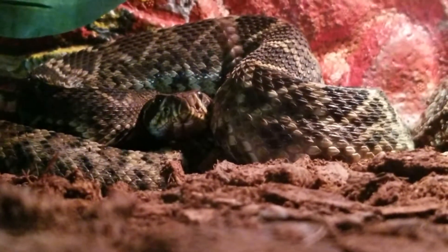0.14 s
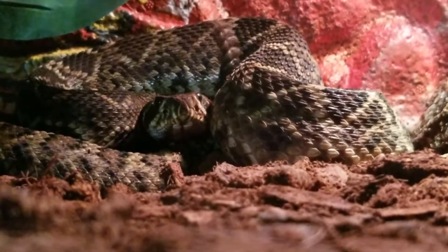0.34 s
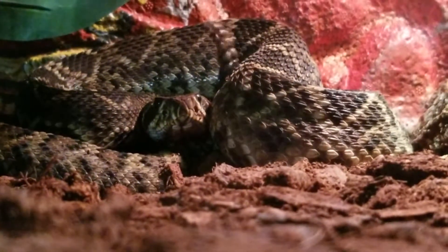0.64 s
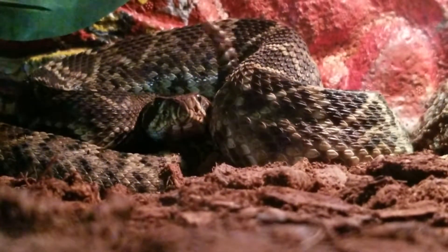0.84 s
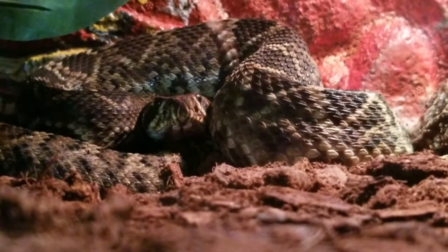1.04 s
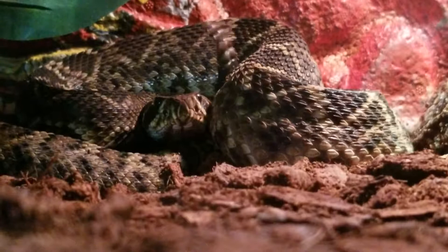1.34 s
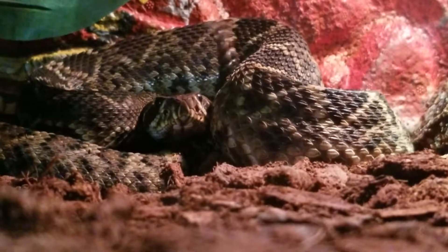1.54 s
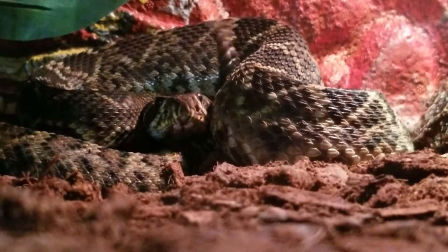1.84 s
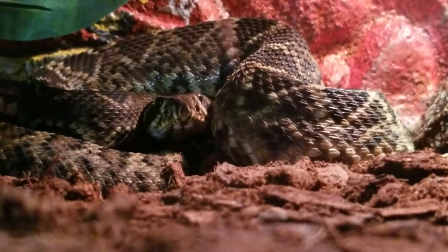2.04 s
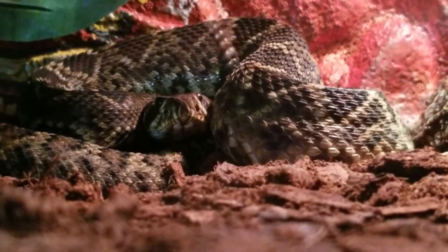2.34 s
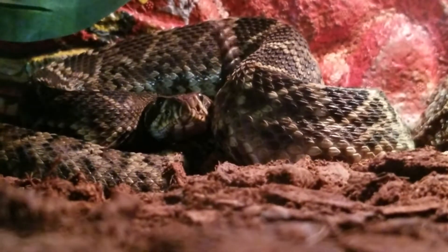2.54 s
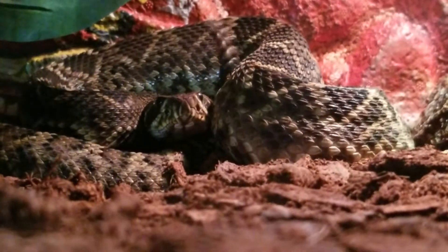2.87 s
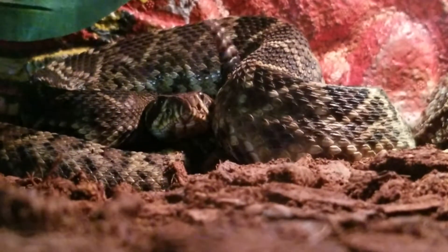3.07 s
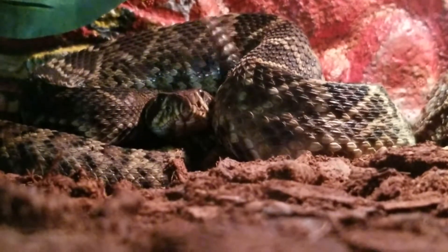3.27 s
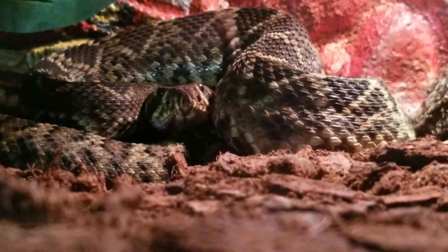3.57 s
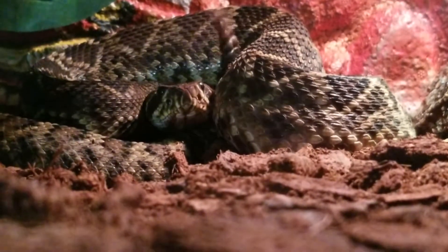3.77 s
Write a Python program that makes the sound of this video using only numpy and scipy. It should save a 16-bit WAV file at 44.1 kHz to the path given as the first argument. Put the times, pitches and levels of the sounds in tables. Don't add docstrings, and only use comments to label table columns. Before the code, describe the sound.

A rattlesnake's rattle buzzes nonstop, a dry, bright, hissing chatter close up in a small enclosure.

```python
import sys
import numpy as np
from scipy import signal
from scipy.fft import rfft, irfft, next_fast_len
from scipy.io import wavfile
from scipy.ndimage import uniform_filter1d, map_coordinates

SR = 44100
rng = np.random.default_rng(int(sys.argv[2]) if len(sys.argv) > 2 else 0)


def to_wav(sig):
    pcm = np.clip(np.atleast_2d(sig), -1, 1) * 32767
    pcm = np.round(pcm).astype(np.int16)
    wavfile.write(sys.argv[1], SR, pcm.T)


def how_loud(loudness_db):
    steps = np.asarray(loudness_db, float) / 20
    return 10 ** steps


N = 172431
CLACK_RATE = 102
PLACES = 3


def unit(x):
    return x / np.sqrt(np.mean(x ** 2) + 1e-20)


def along(points, hz):
    f, v = np.transpose(points)
    return np.interp(np.log(hz + 1), np.log(f + 1), v)


def wobble(rate):
    knots = rng.standard_normal(int(N * rate / SR) + 4)
    return map_coordinates(knots, [np.arange(N) * rate / SR])


def filtered(x, response):
    m = 2 * next_fast_len(N // 2 + SR // 4)
    hz = np.fft.rfftfreq(m, 1 / SR)
    return irfft(rfft(x, m) * response(hz), m)[..., :N]


def causal(db):
    c = irfft(np.log(how_loud(np.maximum(db, -90))))
    c[1:len(c) // 2] *= 2
    c[len(c) // 2 + 1:] = 0
    return np.exp(rfft(c))


def patchy(x, patchy_db):
    z = signal.stft(x, nperseg=512)[2]
    field = rng.standard_normal(z.shape[1:])
    field = uniform_filter1d(field, size=3, axis=0)
    field = uniform_filter1d(field, size=12, axis=1)
    return signal.istft(z * how_loud(patchy_db * unit(field)), nperseg=512)[1][:, :N]


def rush(spectrum):
    # frequency in Hz, left-right correlation.
    likeness = [(60, 0.97), (130, 0.87), (300, 0.67), (640, 0.42), (2000, 0.24)]

    def mid_side(hz):
        turn = np.arccos(np.clip(along(likeness, hz), -1, 1)) / 2
        return how_loud(along(spectrum, hz)) * [np.cos(turn), np.sin(turn)]

    mid, side = filtered(rng.standard_normal((2, N)), mid_side)
    return np.array([mid + side, mid - side]) / mid.std()


def rattle():
    t = np.arange(N) / SR
    # time in seconds, lead over the steady beat in clacks, contrast within a swing as a factor, level in dB.
    shake = [(0, -0.0072, 2.1, -39), (0.199, -0.2, .7, -41), (0.401, 0.0048, 0.76, -40),
             (0.649, 0.19, 1.4, -42), (0.902, -0.016, 1.5, -41.5), (1.15, 0.04, 1.8, -41),
             (1.361, 0.032, 1, -43), (1.461, 0.36, 1.84, -39.5), (1.7, 0.27, 1.17, -43),
             (1.95, 0.008, 0.85, -41.5), (2.201, 0.017, 1.37, -41.5), (2.45, -0.16, 1.54, -43.5),
             (2.697, -0.55, 1.5, -41.5), (2.951, -0.67, 1.4, -43), (3.199, -0.82, 2.15, -41.5),
             (3.451, -0.9, 1.1, -41.5), (3.698, -0.92, 0.91, -40.5), (3.91, -0.9, 1.5, -41)]
    s, *columns = np.transpose(shake)
    ahead, contrast, level_db = (np.interp(t, s, c) for c in columns)
    beat = CLACK_RATE * t + ahead + 0.15

    def upper(hz):
        return 1 / (1 + (8700 / (hz + 1)) ** 6)

    dark, bright = clacks(t, beat, contrast, level_db)
    blows = filtered(dark, lambda hz: 1 - upper(hz))
    blows += how_loud(1.5 * np.tanh(wobble(10))) * filtered(bright, upper)
    blows += how_loud(-3.5) * chatter(t, beat, contrast)

    sweep_s = 0.000015
    position = np.arange(PLACES) - (PLACES - 1) / 2
    lag = np.outer([1, -1], position)[..., None] * sweep_s
    direct = filtered(blows, lambda hz: np.exp(1j * np.pi * hz * lag)).sum(1)
    heard = direct + how_loud(0.5) * sum(panes(place[None]) for place in blows)

    # frequency in Hz, gain in dB.
    mic = [(11000, 0), (12700, 2), (13200, -2), (13900, -2), (14500, 3), (15100, 8), (15700, 10)]
    heard = patchy(heard, patchy_db=1.35)
    heard = filtered(heard, lambda hz: segments(hz) * causal(along(mic, hz)))
    power = np.abs(uniform_filter1d(heard.mean(0) ** 2, SR // 4))
    return heard * how_loud(level_db) / np.sqrt(power)


def clacks(t, beat, contrast, level_db):
    count = 20
    scatter_db, tilt_db, jitter_s = 2.0, 1.8, 0.0004
    spread_s, tick_db = 0.0017, 1.2
    # time in seconds, peak in dB, treble relative to the peak in dB.
    accents = [(0.0973, -30, -18), (0.1364, -33.5, -17.5), (0.185, -26, -16.5), (0.2844, -23.5, -17),
               (0.3807, -29.5, -19), (0.528, -30, -7), (0.7109, -31.5, -21), (0.7617, -33.5, -8),
               (0.8117, -30.5, -14), (0.8592, -31.5, -14.5), (0.9573, -32, -13.5), (1.1537, -27.5, -10),
               (1.2027, -28, -11.5), (1.2516, -26, -8), (1.3015, -27.5, -14), (1.3506, -30.5, -15),
               (1.3992, -26, -5.5), (1.4671, -32.5, -8), (1.5243, -32.5, -14), (1.6237, -33, -18),
               (1.6708, -27.5, -16), (1.7224, -28.5, -13), (1.7719, -27.5, -10), (1.82, -26.5, -7.5),
               (1.8678, -24, -10), (1.9096, -25.5, -10.5), (1.9603, -29, -19), (2.0086, -28, -11.5),
               (2.0553, -34, -6.5), (2.067, -28, -16.5), (2.2047, -29.5, -13.5), (2.261, -26.5, -13),
               (2.3137, -28.5, -16), (2.3611, -27, -13), (2.4605, -29.5, -12.5), (2.5114, -35.5, -6),
               (2.5605, -27.5, -19.5), (2.611, -27, -9.5), (2.6607, -26.5, -5.5), (2.7111, -26, -10),
               (2.7583, -28.5, -14), (2.8, -27.5, -12.5), (2.8505, -30, -9.5), (2.897, -29, -12),
               (2.954, -32.5, -12), (2.996, -30, -13.5), (3.044, -30, -14), (3.1308, -30.5, -13.5),
               (3.191, -37.5, -6.5), (3.2319, -30.5, -11.5), (3.2804, -32.5, -3), (3.329, -30, -16),
               (3.4292, -25.5, -11.5), (3.477, -25.5, -14.5), (3.5253, -26.5, -17), (3.6553, -25.5, -14.5),
               (3.7027, -26, -13), (3.7523, -27.5, -10), (3.8513, -29.5, -12), (3.8902, -27.5, -8.5)]

    whole = np.arange(1, int(CLACK_RATE * t[-1]))
    luck = np.tanh(rng.standard_normal((len(whole), 3)))
    tick = rng.random((5, len(whole), count))
    at = np.interp(whole, beat, t)
    db = np.interp(at, t, contrast) * swing_db(whole, at, fade_db=10) + scatter_db * luck[:, 0]
    db = np.minimum(db, 0.5)

    hard_s, peak_db, treble_db = np.transpose(accents)
    hard = np.abs(at[:, None] - hard_s).argmin(0)
    at[hard] = hard_s
    db[hard] = peak_db - np.interp(hard_s, t, level_db) - 12.5
    luck[hard, 1] = 0
    luck[hard, 2] = 0.31 * (treble_db - treble_db.mean())

    start = at + jitter_s * luck[:, 1]
    times = start[:, None] + spread_s * (tick[0] + tick[2] + tick[4] - 0.75)
    size = np.sign(tick[1] - 0.5) * how_loud(db[:, None] + 2 * tick_db * tick[2])
    tilt = tilt_db * luck[:, 2:]
    return [along_tail(times, size * how_loud(way * tilt), tick[3]) for way in (-1, 1)]


def chatter(t, beat, contrast):
    when, sign, strength, place = rng.random((4, 16000))
    when = when * t[-1]
    swung = np.interp(when, t, beat) - 0.045
    fade_db = np.interp(when, t, contrast) * swing_db(swung, when, fade_db=3)
    size = np.sign(sign - 0.5) * how_loud(fade_db - 1.5 * np.log(strength + 0.0091))
    return along_tail(when, size, place)


def swing_db(beat, t, fade_db):
    swing_clacks, fade_bend = 5, 1.05
    # start in seconds, which clack of the swing leads.
    leads = [(0, 0), (.22, 4), (.6, 3), (1.43, 0), (1.49, 1), (1.89, 0), (2.24, 1), (2.78, 0), (3.07, 4),
             (3.645, 3), (3.69, 2), (3.875, 1)]
    s, lead = np.transpose(leads)
    since = beat - lead[np.searchsorted(s, t, "right") - 1]
    u = since % swing_clacks / swing_clacks
    return -fade_db * u ** fade_bend


def along_tail(s, size, place):
    where = (place * PLACES).astype(int)
    return unit(np.array([ticks(s, size * (where == k)) for k in range(PLACES)]))


def ticks(s, size):
    at = np.clip((s * SR).astype(int), 0, N - 1).ravel()
    return np.bincount(at, np.ravel(size), N)


def segments(hz):
    # frequency in Hz, density in dB per Hz.
    shell = [(1120, -47.5), (2000, -36.5), (2560, -16), (3300, -9), (4600, -10.5), (5300, -4), (6100, -3),
             (8300, -6), (10000, -5.5), (13000, -11.5)]
    # frequency in Hz, width in Hz, level in dB.
    rings = [(4970, 40, -6), (5300, 25, -3), (5430, 18, 1), (5815, 24, -1), (5975, 30, -3), (6117, 25, -1),
             (6220, 25, -3), (6520, 60, -4), (6728, 30, -3), (7525, 40, -2), (7976, 40, -3), (9115, 25, -3),
             (10900, 350, -2), (12400, 300, -2)]
    # frequency in Hz, left over right in dB.
    left_over_right = [(2000, 1.5), (4400, 3.5), (7000, 3), (8100, 9.5), (9500, -6.5), (11500, 8.5),
                       (16000, -5)]
    # frequency in Hz, lead of the left side in radians.
    left_lead = [(2410, 0.17), (4220, 5.96), (6000, 5.78), (16000, 8)]

    ring = sum(how_loud(db) * 1j * hz * w / (c * c - hz * hz + 1j * hz * w) for c, w, db in rings)
    ring = how_loud(2.2) * how_loud([[0], [-5]]) * ring
    side = how_loud(np.outer([0.5, -0.5], along(left_over_right, hz)))
    side = side * np.exp(np.outer([0.5j, -0.5j], along(left_lead, hz)))
    return causal(along(shell, hz)) * (1 + ring) * side


def panes(x):
    # frequency in Hz, 60 dB decay time in seconds.
    decay = [(2000, 0.029), (6000, 0.18), (15000, 0.011)]
    hz, t, z = signal.stft(rng.standard_normal((2, SR // 4)), SR, nperseg=128)
    fade = how_loud(-60 * t / along(decay, hz)[:, None])
    tail = signal.istft(z * fade, SR, nperseg=128)[1]
    late = np.pad(x, ((0, 0), (40, 0)))
    return signal.fftconvolve(late, tail / np.linalg.norm(tail[0]), axes=1)[:, :N]


def handling():
    # time in seconds, peak in dB, thump over the peak in dB, pan to the left in dB, dullness in dB.
    bumps = [(.055, -64.5, -10, 2, -10.5), (0.144, -41.5, -1, -6.5, -0.5), (0.198, -60, -3, -8, -9.5),
             (0.33, -65.5, -8, 7, -6), (0.46, -62.5, -23, 18, -5), (1.316, -55.5, -10, -1, 8),
             (1.335, -60, -15, 1, 10), (1.42, -65, -7, 2, -6), (1.566, -62, 16, 4, 4),
             (2.276, -58, -18, 3, -7), (2.281, -62.5, 18.5, 0, 0), (2.29, -57, -1, 5, -6),
             (2.298, -62, 13, 0, 12), (2.306, -59, -4, 2, -1), (2.313, -67, 11, -7, -13),
             (2.322, -63, 8, 0, 0), (2.525, -62, -7, 13, -4), (2.559, -67, 0, 7, -12),
             (2.643, -71, -8, 8, 1), (2.653, -53, -8, 16, 4), (2.892, -66, 0, 0, 0)]
    # frequency in Hz, density in dB per Hz.
    scuff_colour = [(150, 10), (400, 1), (650, -8.5), (1500, -8), (3000, -9.5)]
    thump_hz, thump_t60, thump_rise_s, thump_early_s = 97, 0.04, 0.0027, 0.0024
    scuff_s, snap_s, snap_db, dull_hz = 0.016, 0.0015, 9.5, 604

    bright = rush([(60, -60)] + scuff_colour + [(6000, -62)])
    dull = filtered(bright, lambda hz: 1 / (1 + (hz / dull_hz) ** 4))
    v = np.arange(SR // 8) / SR
    u = np.maximum(v - thump_early_s, 0)
    push = -how_loud(6.5 - 60 * v / thump_t60) * (1 - np.exp(-v / thump_rise_s))
    push = push * np.sin(2 * np.pi * thump_hz * v)
    dying = how_loud(-11.0) * (u > 0) * (np.exp(-u / scuff_s) + how_loud(snap_db) * np.exp(-u / snap_s))

    out = np.zeros((2, N))
    for s, db, thump_db, pan_db, dull_db in bumps:
        span = round((s - thump_early_s) * SR) + np.arange(len(v))
        scuff = dull[:, span] + how_loud(-dull_db) * (bright[:, span] - dull[:, span])
        pan = how_loud(np.array([[pan_db], [-pan_db]]) / 2)
        out[:, span] += how_loud(db) * (pan * dying * scuff + how_loud(thump_db) * push)
    return out


def boom():
    # start in seconds, length in seconds, level in dB.
    booms = [(1.178, 0.048, -65), (1.513, 0.16, -63), (2.313, 0.15, -65.5), (2.975, 0.056, -57),
             (3.068, 0.056, -58), (3.193, .08, -67.5), (3.357, 0.065, -61), (3.494, 0.11, -75),
             (3.543, .07, -67), (3.647, 0.043, -58.5), (3.851, 0.034, -65)]
    boom_hz, rise_s, sway_db = 112.6, 0.039, 1.5
    t = np.arange(N) / SR
    swell = np.zeros(N)
    for s, length, db in booms:
        inside = np.minimum(t - s, s + length - t)
        swell += how_loud(db) * np.clip(inside / rise_s + 1, 0, 1) ** 2
    tone = np.sin(2 * np.pi * boom_hz * t + 0.9 * wobble(21))
    return np.sqrt(2) * swell * how_loud(sway_db * wobble(21.75)) * tone


def room():
    # time in seconds, level in dB.
    traffic = [
        (0.0, -55),
        (0.41, -62.5),
        (0.83, -62),
        (1.15, -63.5),
        (1.69, -61),
        (2.06, -63),
        (2.45, -59),
        (2.78, -65),
        (3.12, -61.5),
        (3.91, -65),
    ]
    # frequency in Hz, density in dB per Hz.
    rumble_colour = [(13, -57), (22, 2), (70, -3.5), (135, -6.5), (183, -25), (296, -19), (375, -30.5),
                     (407, -24.5), (600, -43), (780, -34), (1320, -120)]
    hiss_colour = [(260, -17), (450, -9), (1200, -11), (1800, -7), (2300, -15), (2990, -38), (5060, -120)]
    t = np.arange(N) / SR
    rumble = how_loud(np.interp(t, *np.transpose(traffic)) + 1.5 * wobble(15)) * rush(rumble_colour)
    hiss = how_loud(-80.5 + 0.13 * wobble(7.1)) * patchy(rush(hiss_colour), patchy_db=1.5)
    return rumble + hiss


def scene():
    return rattle() + handling() + boom() + room()


def top_cut(x):
    return signal.sosfilt(signal.butter(12, 17160, fs=SR, output="sos"), x)


def record(dry):
    band = filtered(dry, lambda hz: 1 / (1 + (hz / 15750) ** 400) / (1 + (37 / (hz + 1)) ** 6))
    return top_cut(band)


dry = scene()
out = record(dry)
to_wav(out)
```